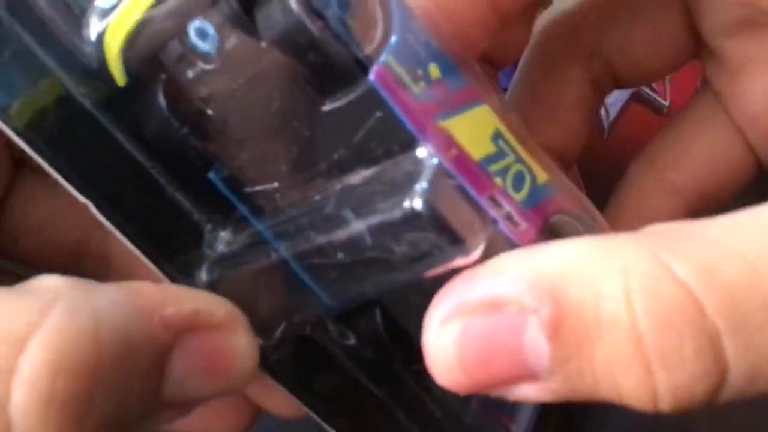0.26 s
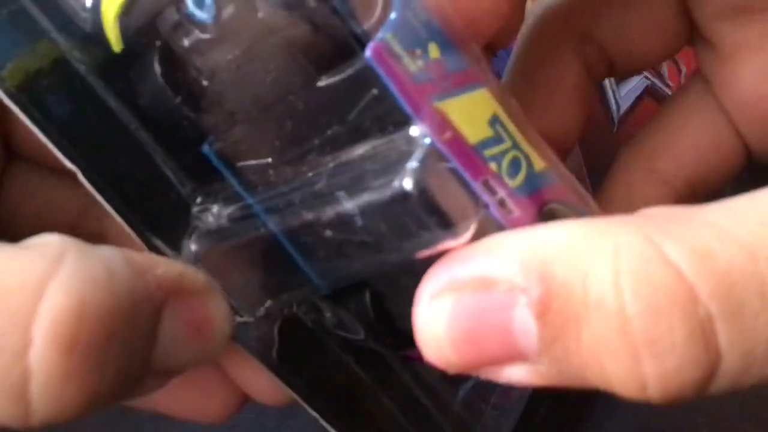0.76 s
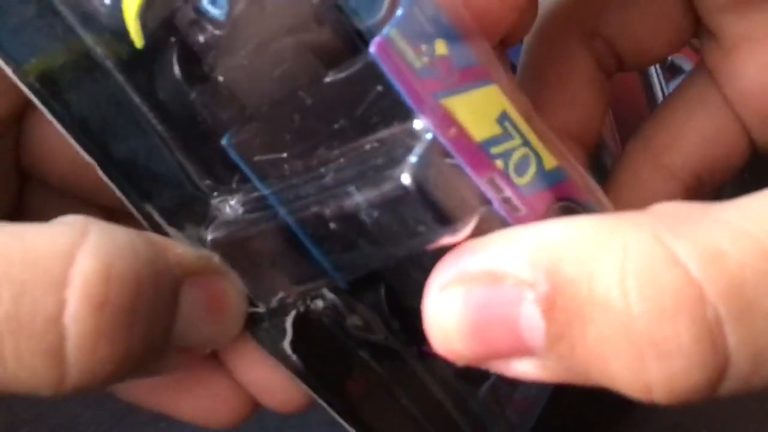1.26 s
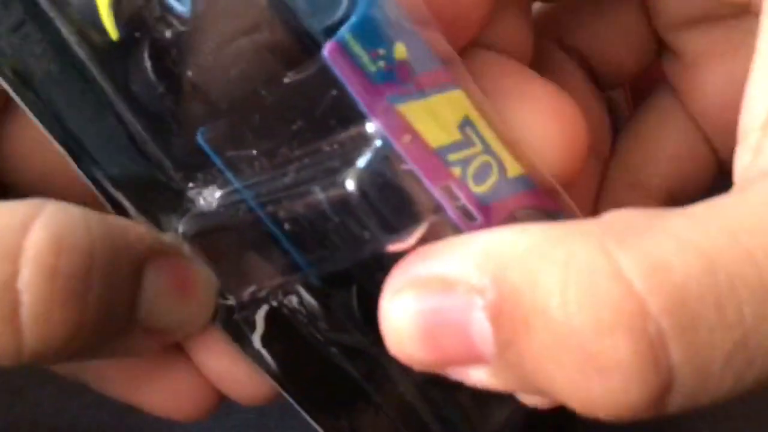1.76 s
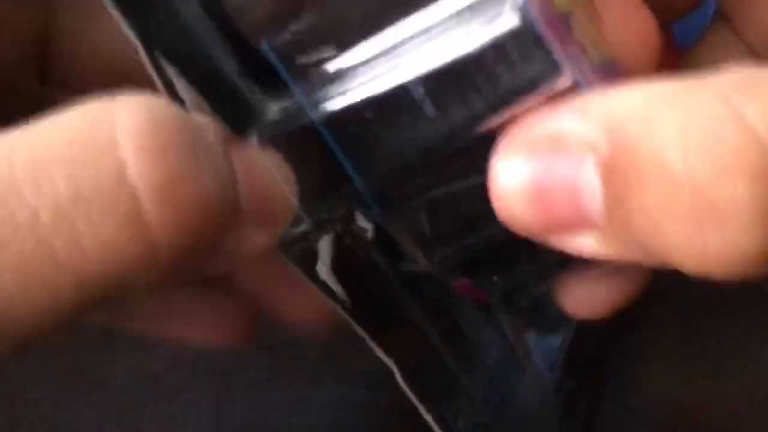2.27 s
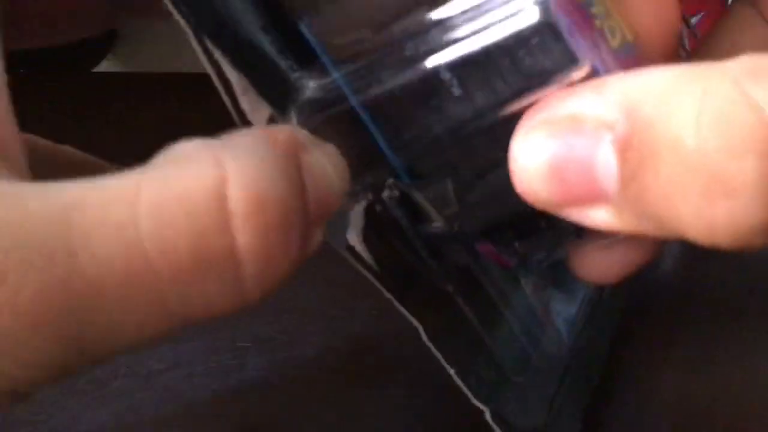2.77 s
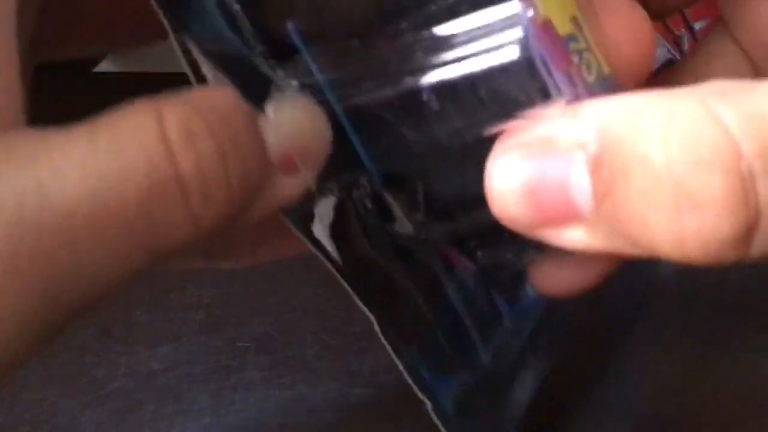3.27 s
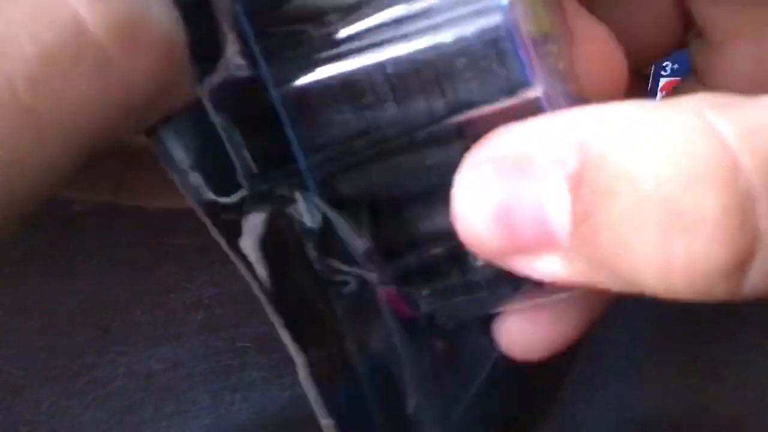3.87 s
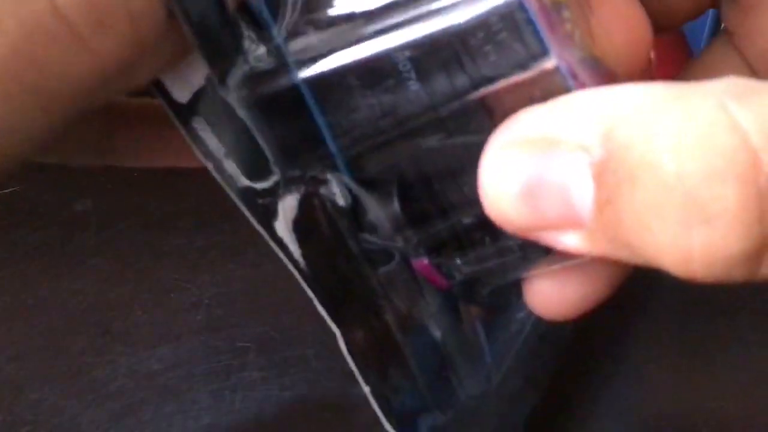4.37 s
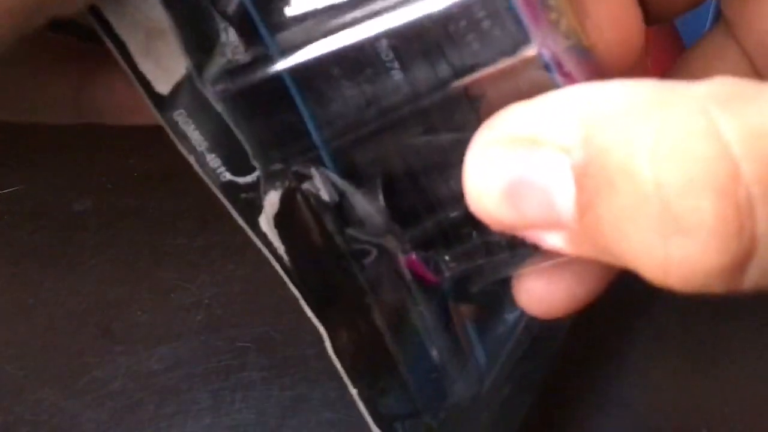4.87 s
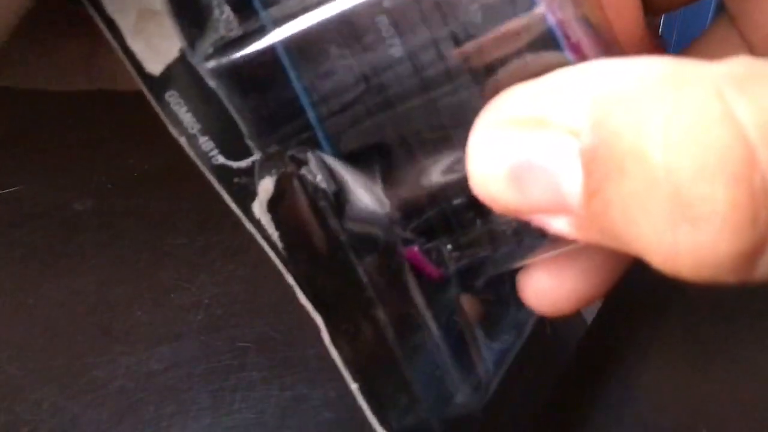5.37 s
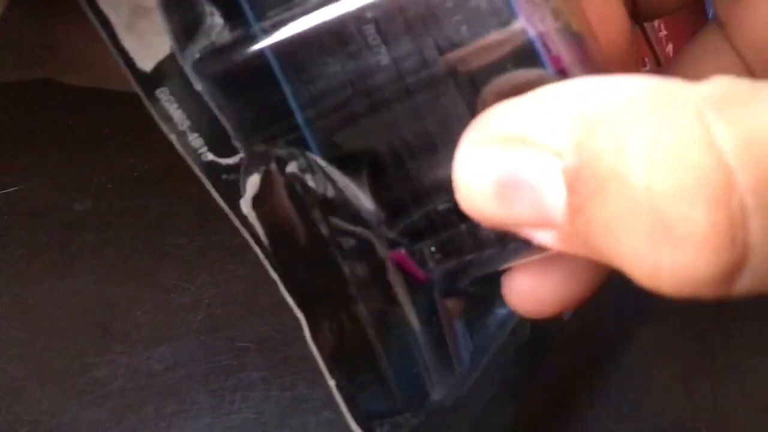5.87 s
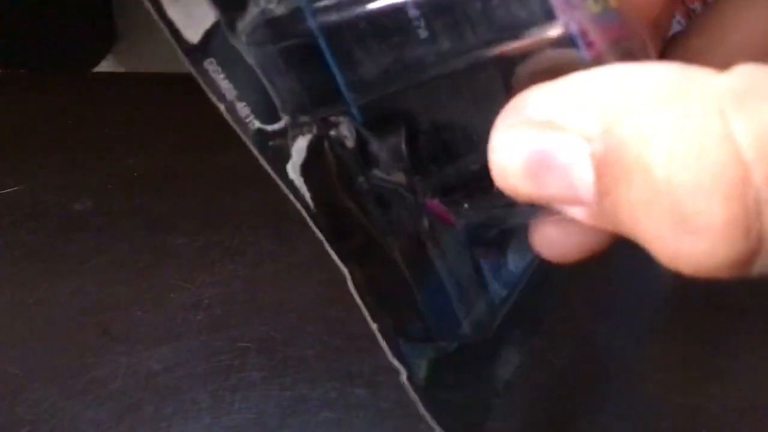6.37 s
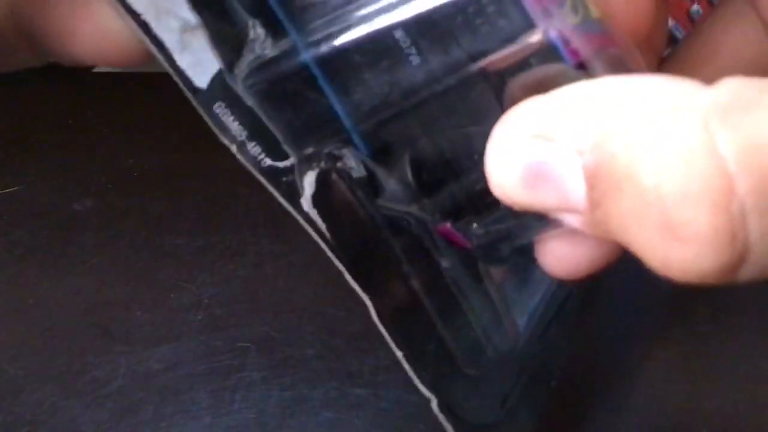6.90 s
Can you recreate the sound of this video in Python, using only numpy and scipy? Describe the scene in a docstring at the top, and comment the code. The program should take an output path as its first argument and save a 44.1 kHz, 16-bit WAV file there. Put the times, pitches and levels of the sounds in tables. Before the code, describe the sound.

Very close in a quiet small room, fingers rub and bend a stiff plastic blister pack on its card. Bright scraping and fine crackle run along with creasing ticks and hollow shell knocks. Sharp snaps cluster in the first seconds, then brief ripping bursts come near four, almost six and seven seconds, with softer handling between them.

```python
"""Prying open a plastic blister pack

Two hands bend and pry at a stiff plastic pack on its card, close by in a small room.
Fingers rub over the shell: noise shaped by the plastic, with crackle from tiny fractures.
Creases and the glued edge tick, fingers knock on the shell, and the dome buckles with sharp snaps:
each is a short burst of noise that dies fast, coloured by what is ringing."""
import sys
import numpy as np
from scipy import signal
from scipy.fft import rfft, irfft
from scipy.io import wavfile
from scipy.ndimage import uniform_filter1d

SR = 44100
rng = np.random.default_rng(int(sys.argv[2]) if len(sys.argv) > 2 else 0)


def store_wav(level_fs):
    """Save 16-bit WAV to argv[1]."""
    pcm = np.round(np.clip(np.atleast_2d(level_fs), -1, 1) * 32767)
    wavfile.write(sys.argv[1], SR, pcm.T.astype(np.int16))


N = 314874
TIME = np.arange(N) / SR  # seconds
TAPS = 2048  # length of one strike or filter, in samples
HZ = np.fft.rfftfreq(TAPS, 1 / SR)
LONG_HZ = np.fft.rfftfreq(N, 1 / SR)  # frequencies of the whole scene


def amp(db):
    """Turns decibels into a gain."""
    return 10 ** (np.asarray(db) / 20)


def unit(x):
    """Scales a sound to an rms of 1."""
    return x / np.sqrt(np.mean(x ** 2) + 1e-20)


def read(points, hz=HZ):
    """Reads a spectrum between its points, along a log-frequency axis."""
    f, value = np.transpose(points)
    return np.interp(np.log(hz + 1), np.log(f + 1), value)


def follow(rows):
    """Draws one curve in time for each column of a table after the first, which holds the seconds."""
    seconds, *columns = np.transpose(rows)
    return [np.interp(TIME, seconds, column) for column in columns]


def add(mix, start, sound):
    """Mixes a sound in at a time in seconds."""
    part = mix[max(round(start * SR), 0):][:len(sound)]
    part += sound[:len(part)]


def causal(db):
    """Makes a frequency response with these levels that rings only after it is struck (minimum phase)."""
    log_gain = np.log(amp(np.concatenate([db, db[-2:0:-1]])))
    return np.exp(np.conj(signal.hilbert(log_gain)))[:len(db)]


def ring(hz, lift_db, q):
    """Levels in dB of one resonance standing out of a flat spectrum; a higher q is narrower."""
    detune = q * (HZ / hz - hz / (HZ + 1))
    return 10 * np.log10(1 + (amp(lift_db) ** 2 - 1) / (1 + detune ** 2))


def coloured(x, db):
    """Gives a sound a spectrum, at an rms of 1."""
    return unit(signal.oaconvolve(x, irfft(causal(db)))[:N])


def noise(spectrum):
    """Steady noise with a given spectrum, at an rms of 1."""
    white = rfft(rng.standard_normal(N))
    return unit(irfft(white * amp(read(spectrum, LONG_HZ)), N))


def wander(rate_hz):
    """A smooth random curve with an rms of 1; a higher rate wanders faster."""
    white = rfft(rng.standard_normal(N))
    return unit(irfft(white * np.exp(-(LONG_HZ / rate_hz) ** 2), N))


def strike(db, decay, linger_db, linger, bass_hz=1600, front_db=-7, front=.0005, size=13):
    """A hard front, then bending waves scatter about the sheet and die fast, more slowly in the bass."""
    t = np.arange(TAPS) / SR
    burst, after = rng.standard_normal((2, TAPS))
    burst *= 1 + amp(front_db) * np.exp(-t / front)
    bass = 1 / (1 + (HZ / bass_hz) ** 2)
    quick = rfft(burst * np.exp(-t / decay))
    slow = rfft(burst * np.exp(-t / decay / 2))
    waves = (1 - bass) * quick + bass * slow
    waves += amp(linger_db) * rfft(after * np.exp(-t / linger))
    # the scatter keeps its ripple finer than size bins, while db sets the broad colour
    broad_power = uniform_filter1d(uniform_filter1d(abs(waves) ** 2, size=size), size=size)
    broad_db = 10 * np.log10(broad_power + 1e-12)
    return irfft(waves * causal(db - broad_db))


def quiet_room():
    """The steady, faint noise of the quiet room."""
    # Each row: frequency in Hz, relative level in dB.
    tone_spectrum = [(12, -52.5), (20, -2.5), (153, -5), (478, -15.5), (857, -16.5), (1540, -34.5),
                     (2090, -18.5), (2330, -18), (4430, -20.5), (15500, -23)]
    return amp(-73) * noise(tone_spectrum)


def rumble():
    """Low noise that swells and sinks as the hands jolt the air and the table."""
    # Spectrum of the rumble. Each row: frequency in Hz, relative level in dB.
    thud_spectrum = [(10, 1), (30, 8.5), (70, 5), (130, -6), (250, -11), (600, -48)]
    # How strong the rumble is. Each row: time in seconds, level in dB.
    jolt_levels = [(.9, -89), (1.2, -67.5), (1.55, -78), (1.78, -72), (2.3, -71), (2.5, -87), (3.9, -76),
                   (5.2, -84.5), (5.8, -70.5), (7.1, -78)]
    return amp(follow(jolt_levels)[0]) * noise(thud_spectrum)


def gliding(glide_db=-1.1, regrip_s=2.57, regrip_lasts_s=.15):
    """Share of smooth glide in the rubbing; it fades out around regrip_s, as the grip changes."""
    before_regrip = np.clip((regrip_s - TIME) / regrip_lasts_s + .5, 0, 1)
    return amp(glide_db) * before_regrip


def friction(arch=0.57, tear_range_db=22.5):
    """Grip, slides and tears add in power: gains of walls, hollow and edge, then amounts of crackle and glide."""
    # The holding fingers creep on the pack all the time, harder while they pull. Each row: time in seconds,
    # rub level in dB, then hollow body, fizz and crackle in dB relative to the rub.
    grip_rows = [(.1, -79, -3, 2, -17.5), (.62, -74.5, -9, 4, 0), (.99, -67, -8.5, 6.5, -4),
                 (1.25, -63.5, -11.5, 8, 4), (1.68, -69.5, -3.5, 4, 3), (1.98, -64, -9, 13.5, -6),
                 (2.1, -66.5, -0.5, 1.5, -3), (2.55, -78.5, 4.5, -2.5, -18), (2.98, -79.5, 1, 4, -26.5),
                 (3.25, -70.5, 3, 3.5, -4.5), (3.6, -74, 0.5, 6, 3.5), (4.1, -69.5, 1, 2.5, 4.5),
                 (4.9, -71.5, -3, 4, 1.5), (5.15, -73.5, 0, 3, 3.5), (5.6, -70, -3, 1, 4),
                 (6.3, -72.5, 0.5, 3, -8), (6.68, -70, 2.5, 5, 1.5), (7.13, -72.5, -5, 3, 4.5)]
    # A finger slides over the plastic. Each row: start in seconds, length in seconds, scrape level in dB,
    # then hollow body and fizz in dB relative to the scrape.
    slide_rows = [(0, 0.069, -61.5, -11, 0), (.21, 0.12, -73, -14, 1), (0.42, 0.093, -64.5, -19, 4.5),
                  (0.523, 0.082, -67, -13, 1), (0.649, 0.079, -68, -12, 5), (0.784, .07, -70, -15, 4),
                  (.885, .08, -65.5, -17, 2), (1.314, 0.041, -61.5, -20, 11), (1.517, 0.12, -64.5, -9, 6),
                  (2.304, .105, -63.5, -3, -1.5), (2.445, 0.065, -69, -0.5, -4),
                  (2.666, 0.12, -69.5, -4, 1), (2.865, 0.064, -66.5, -0.5, 0), (3.192, 0.072, -65, -9, 6),
                  (3.478, 0.054, -68, -3, 9.5), (3.647, .13, -70, 3, 13), (4.298, 0.12, -67.5, 1, 1),
                  (4.398, 0.15, -60.5, 0.5, 2.5), (4.934, 0.24, -76, 11, -5),
                  (5.188, 0.12, -68.5, 0.5, 5.5), (5.35, 0.12, -73, 1, 8), (6.077, 0.22, -62.5, 5.5, -3),
                  (6.355, 0.04, -67, 0.5, -4), (6.465, 0.064, -61, 1.5, -9), (6.525, 0.087, -66, 1, 4),
                  (6.71, 0.047, -66, -7, 6), (7.048, .1, -68.5, 11, -13)]
    # The glued seam strains, rips and runs out. Each row: peak in seconds, build-up in seconds,
    # run-out in seconds, level in dB, then hollow body, fizz and crackle in dB relative to that level.
    tear_rows = [(1.869, 0.19, 0.23, -53, -8.5, -9, 2), (2.2, 0.061, 0.1, -52.5, -2, 2, -6),
                 (3.112, 0.11, 0.087, -57.5, -1, -12, -3.5), (3.352, .03, .13, -56.5, -2.5, 8, 3),
                 (3.898, 0.13, 0.097, -45, 0.5, 0, -4), (3.966, 0.055, 0.064, -48, 3.5, 1, 1.5),
                 (4.58, 0.033, 0.089, -50, 1, 1, 2.5), (4.757, 0.0264, 0.054, -55, -1.5, -2, 3),
                 (5.78, 0.048, .055, -42, -8.5, 3.5, -2), (5.832, 0.031, 0.024, -45.5, -5, -1, -6),
                 (6.868, 0.052, 0.06, -45, 2, 3.5, 5)]
    level, body, fizz, crackle = follow(grip_rows)
    power = amp([level, level + body, level + fizz]) ** 2
    for start, length, db, slide_body, slide_fizz in slide_rows:
        # a slide speeds up and slows down as a half sine raised to a power
        speed = np.sin(np.pi * np.arange(0, 1, 1 / (length * SR))) ** arch
        for layer, layer_db in zip(power, (db, db + slide_body, db + slide_fizz)):
            add(layer, start, (amp(layer_db) * speed) ** 2)
    skin = power[0].copy()  # grip and slides, without the tears
    cracks = skin * amp(crackle) ** 2
    for peak, build, run_out, db, tear_body, tear_fizz, tear_crackle in tear_rows:
        t = np.arange(-2 * build, 2 * run_out, 1 / SR)
        # swells by tear_range_db over the build-up and falls by as much over the run-out
        strain = amp(-tear_range_db * np.maximum(-t / build, t / run_out))
        levels = (db, db + tear_body, db + tear_fizz, db + tear_crackle)
        for layer, layer_db in zip((*power, cracks), levels):
            add(layer, peak + t[0], (amp(layer_db) * strain) ** 2)
    walls, hollow, edge = np.sqrt(power)
    crackle_amount = np.sqrt(cracks / power[0])
    glide = gliding() * np.sqrt(skin / power[0])
    return walls, hollow, edge, crackle_amount, glide


def grains(per_s, spread_db, lift_db=14, count=20):
    """Sparse tiny fractures of uneven size, each ringing one of many spots on the sheet."""
    out = np.zeros(N)
    for hz in np.geomspace(2600, 14000, count):
        sizes = amp(spread_db * np.minimum(rng.exponential(1, N), 3))
        breaks = rng.random(N) < per_s / count / SR
        spot = strike(ring(hz, lift_db, q=14), decay=0.00053, linger_db=-16.0, linger=0.0028, size=41)
        out += signal.oaconvolve(sizes * breaks, spot)[:N]
    return unit(out)


def sheet(x, ripple_db=3.0):
    """The many narrow resonances of the thin sheet shift as the grip changes."""
    z = signal.stft(x, nperseg=512)[2]
    ripple = uniform_filter1d(rng.standard_normal(z.shape), size=4, axis=0)  # across frequency
    ripple = uniform_filter1d(ripple, size=16, axis=1)  # across time
    return signal.istft(z * amp(ripple_db * unit(ripple)), nperseg=512)[1][:N]


def rubbing(pressure_db=1.5, flutter_db=2.5, body_flutter_db=3.5, body_crackle_db=-5):
    """Smooth gliding, rough scraping and crackle sound through the hollow dome, its walls and the sharp edge."""
    # Spectra of a gliding finger in the walls and at the very top, of scraping and its fizz, and of the
    # hollow dome. Each row: frequency in Hz, relative level in dB.
    hiss_spectrum, air_spectrum = [(300, -17), (800, -5), (1150, 3.5), (1500, -1), (2000, -6.5),
                                   (3600, -12), (4200, 1), (4550, 10), (4950, -1), (5700, -13), (7500, -16),
                                   (11000, -18.5)], [(4500, -38.5), (7000, -3.5), (9000, -7.5), (11500, -4),
                                                 (13000, 3), (14500, 1), (15700, 2), (16500, -15.5)]
    scrape_spectrum, fizz_spectrum = [(900, -35.5), (1500, -3.5), (1800, 4), (2150, -1), (2800, 3.5),
                                      (3400, 0.5), (4100, 3), (5000, -2), (5700, 1.5), (6800, -3.5),
                                      (8000, -18), (11000, -45)], [(4500, -24.5), (6500, -30), (7500, -6.5), (9500, -3),
                                                      (10800, -4), (12400, 0), (14000, -3), (15700, -4),
                                                      (16500, -32)]
    body_spectrum = [(60, -25.5), (180, -9.5), (260, -3), (360, 5), (520, -2.5), (760, 4), (1020, 4),
                     (1200, 2.5), (1400, -2.5), (1700, -13), (2400, -40.5)]
    wall_gain, hollow_gain, edge_gain, crackle, glide = friction()
    scrape = np.sqrt(1 - glide ** 2)
    fractures = crackle * grains(per_s=340, spread_db=6.0)
    balance = np.hypot(1, crackle)  # keeps the power steady as crackle joins the noise
    smooth = (rng.standard_normal(N) * amp(pressure_db * wander(18)) + fractures) / balance
    rough = (sheet(rng.standard_normal(N)) * amp(flutter_db * wander(99)) + fractures) / balance
    walls = glide * coloured(smooth, read(hiss_spectrum)) + scrape * coloured(rough, read(scrape_spectrum))
    edge = glide * coloured(smooth, read(air_spectrum)) + scrape * coloured(rough, read(fizz_spectrum))
    # the dome answers to the slower stick and slip of the skin, and more faintly to each fracture
    slips = sheet(rng.standard_normal(N)) * amp(body_flutter_db * wander(70))
    hollow = coloured(slips + amp(body_crackle_db) * fractures, read(body_spectrum))
    return wall_gain * walls + hollow_gain * hollow + edge_gain * edge


def room(x, echo_db=-27, echo_s=0.01, tail_db=-23):
    """One early bounce off a near surface, with a faint short tail of fading noise."""
    # How fast the tail dies. Each row: frequency in Hz, time to fall by 60 dB in seconds.
    decay_times = [(200, 0.51), (1000, 0.14), (4000, 0.14), (14000, 0.29)]
    hz, t, z = signal.stft(rng.standard_normal(SR // 2), SR, nperseg=256)
    fading = amp(-60 * t / read(decay_times, hz)[:, None])
    tail = signal.istft(z * fading, SR, nperseg=256)[1]
    response = amp(tail_db) * tail / np.linalg.norm(tail)
    response[0] += amp(echo_db)
    return signal.fftconvolve(x, np.pad(response, (round(echo_s * SR), 0)))[:N]


def ticks(lift_db=8, wall_hz=4850, wall_db=8):
    """Each small crease has its own high ring; the wall that hisses under the gliding finger joins in."""
    # Creases and the glued edge give way. Each row: time in seconds, level in dB, brightness in dB.
    tick_rows = [(0.545, -21, 0.5), (0.7111, -28.5, 7.5), (0.813, -26, 1), (0.8694, -36, 9),
                 (0.955, -36.5, 15.5), (1.0747, -26.5, 13), (1.1145, -17, 4), (1.2594, -25, 9),
                 (1.2633, -14, 8), (1.279, -18, 5.5), (1.3106, -16, 5), (1.318, -20.5, 7),
                 (1.355, -10.5, -2), (1.3732, -19, 0), (1.4145, -19.5, 4.5), (1.487, -20, 5),
                 (1.5204, -21.5, 3), (1.5918, -13.5, 0), (1.8249, -19, 8), (1.8633, -29, 17),
                 (1.8924, -22, 5), (2.0187, -10.5, -16), (2.8318, -37, 9), (3.272, -28.5, 10),
                 (3.2818, -22, 8), (3.3417, -3.5, -4.5), (3.364, -29, 13), (3.397, -19, 7),
                 (3.4699, -33, 14), (3.499, -18.5, 2), (3.781, -26, 11), (3.804, -27.5, 13),
                 (3.9585, -16, -6), (3.974, -5, -18), (4.1204, -21, -2.5), (4.2726, -27.5, 6.5),
                 (4.314, -17.5, -4), (4.413, -15.5, 2.5), (4.5813, -17, -9), (4.6179, -26, 5),
                 (4.7509, -12, -4), (5.0486, -20.5, -2), (5.0725, -17.5, 4), (5.097, -17, -3),
                 (5.263, -20, 1), (5.434, -8.5, -38), (5.4632, -20, 1), (5.5082, -24, -1),
                 (5.5884, -14, -17.5), (5.704, -17.5, -1.5), (5.7285, -22.5, 3), (6.047, -36.5, 15),
                 (6.381, -10.5, -12.5), (6.5935, -15.5, 1), (6.921, -22.5, 2), (6.997, -25, -2)]
    # Basic colour of a tick. Each row: frequency in Hz, relative level in dB.
    tick_spectrum = [(100, -23), (400, -14), (1000, -14.5), (1700, -14), (2800, -7), (4600, -9.5),
                     (6500, -10), (9000, -5), (12500, -3.5), (16000, -8.5)]
    out = np.zeros(N)
    glide = gliding()
    for (s, db, bright), place in zip(tick_rows, rng.random(len(tick_rows))):
        crease = ring(2600 * 5 ** place, lift_db, q=9)  # anywhere from 2600 to 13000 Hz
        wall = ring(wall_hz, wall_db * glide[round(s * SR)], q=12)
        colour = read(tick_spectrum) + read([(4500, 0.0045), (9000, bright)]) + crease + wall
        add(out, s, strike(db + colour, decay=0.0021, linger_db=-22.5, linger=0.0086, size=45))
    return out


def knocks(shell_lift_db=19, shell_q=8.3, settle_s=.006, settle_db=-12.5):
    """A soft finger sets the whole shell swinging and settles with a second touch; the pitch follows the grip."""
    # Fingers bump the shell. Each row: time in seconds, level in dB around 300 Hz before the ring is added,
    # middle and treble in dB relative to that level, ring of the gripped shell in Hz.
    knock_rows = [(0.86, -34.5, 1.5, -1, 1430), (1.2147, -13, 2, -10, 347), (1.646, -23.5, -7, -12, 330),
                  (1.749, -13.5, -7, -5.5, 440), (1.771, -5.5, -4, -7, 197), (1.776, 1, -7, -9.5, 193),
                  (2.053, -16.5, -12.5, -7.5, 654), (2.119, -18.5, 2.5, -2, 646),
                  (2.1341, -19.5, 10, 7.5, 330), (2.1689, -4, -8.5, -22, 365),
                  (2.2516, -3, -20, -10.5, 780), (2.7403, -24.5, 0.5, -15, 1250),
                  (3.176, -24.5, 6.5, -6, 340), (3.299, -16.5, -12.5, -8, 1030), (3.3392, -19.5, 2, 4, 695),
                  (3.7664, -18, 15.5, -1, 273), (4.234, -17.5, -22, -29, 323), (4.41, -14, 0, -16, 330),
                  (4.4336, -8, -23, -30, 690), (4.4533, -19, -9, -7, 340), (4.477, -9, -20, -16, 694),
                  (4.5036, -17, 7.5, -16, 347), (4.571, -11, -3, -4.5, 382), (4.667, -9, -2.5, -21, 359),
                  (4.7415, -18, 6, -3.5, 854), (4.8162, -8.5, -5, -21, 366), (4.8717, -35.5, 18.5, -6, 740),
                  (5.368, -24.5, 3.5, -2.5, 394), (5.5909, -13.5, 8, -22, 404),
                  (5.5971, -17.5, 7, -31, 360), (5.6419, -16, 3, -38, 378), (5.6976, -18, 2.5, -48, 367),
                  (5.9012, -28, 19, 8.5, 372), (6.035, -22, 1, -15, 423), (6.053, -18.5, -2, -33, 410),
                  (6.269, -16, -11.5, -14, 910), (7.0881, -18, 18.5, -19, 540),
                  (7.1205, -16, -15, -10, 424)]
    out = np.zeros(N)
    lateness = rng.uniform(0.21, 1.8, len(knock_rows))  # in multiples of settle_s
    for (s, db, mid, treble, hz), late in zip(knock_rows, lateness):
        colour = read([(40, -28.5), (150, -3.5), (300, -4.0), (1000, mid),
                       (3200, treble), (7000, treble - 14), (16000, treble - 26)])
        shell = ring(hz, shell_lift_db, shell_q)
        # the second touch is lighter and lacks the ring
        for delay, touch_db in ((0, shell), (late * settle_s, settle_db)):
            hit = strike(db + colour + touch_db, decay=0.002, linger_db=-21, linger=0.015, size=7)
            add(out, s + delay, hit)
    return out


def snaps(dome_db=-3.5, linger_db=-28):
    """A facet of the dome flips over and rings for a few cycles, and the whole dome with it."""
    # The dome buckles; the row at 1.456 s is instead a crease ticking, voiced like the snaps. Each row: time in
    # seconds, level in dB around 3.2 kHz before the dome and rings are # added, bass, middle and top in dB
    # relative to that level, ring of the facet in Hz.
    snap_rows = [(1.0158, 12.5, -9.5, -14, -7, 993), (1.1381, -2.5, -5, -10.5, 6, 8660),
                 (1.4561, -12, -20, -15, 7.5, 4830), (1.5404, -15, -6, -14, 1.5, 4700),
                 (1.7786, -7, -4, 7.5, -4, 2180), (1.8013, -7, -9, -23, -0.5, 1160),
                 (1.8435, 5, -16, -13.5, -7, 1076), (1.868, -16, -19, -9, 8, 1000),
                 (1.9275, -13.5, -2, -24, -2, 7900), (2.1933, -5, -28, -3, -7, 757),
                 (2.246, -8.5, -6, 0.5, -10, 764), (2.4394, -6.5, -11, -7.5, 11.5, 2910),
                 (2.4493, -11.5, -8, -3, -21, 990), (3.0314, -12.5, -2.5, -6.5, -8, 1020),
                 (3.041, -6.5, -16, -11, 0, 800), (3.0851, -11.5, 6, 16.5, -16, 3180),
                 (3.0963, -10, -5, 14, 4.5, 9470), (3.116, -8, 0, -1, 0, 9900),
                 (3.159, -24.5, 14, 6, 13.5, 3560), (3.3437, -12.5, 9, 12.5, 1.5, 3460),
                 (3.5371, -18.5, -7, -9, 12.5, 3150), (3.8438, -15, 5, 16, -11, 3340),
                 (3.9142, 3.5, 1, -7.5, -11.5, 1930), (3.9478, -1, -4, -8, -12, 9800),
                 (4.568, -25.5, 23.5, 18, 11, 3480), (5.795, 2, -24, -0.5, 2, 5940),
                 (5.7975, -6.5, -12, 2, 15, 883), (6.1884, 7, -32, -4, -2.5, 5600),
                 (6.8704, -11, -11, -13, 3, 920), (6.873, -13, -8, 14.5, 3, 977),
                 (7.0524, -5.5, -4.5, 8.5, 5.5, 3120)]
    # Resonances of the whole dome, shaken by every snap. Each row: frequency in Hz, lift in dB, sharpness Q.
    dome_rings = [(339, 9, 18), (706, 5.5, 9.5), (1492, 1, 20), (2620, 6.5, 20), (3540, 3, 11),
                  (4700, 3.5, 4), (9040, 2, 5.6)]
    out = np.zeros(N)
    dome = dome_db + sum(ring(hz, lift, q) for hz, lift, q in dome_rings)
    for s, db, bass, mid, top, hz in snap_rows:
        # small facets ring higher, stand out less and die sooner
        octaves = np.log2(hz / 1000)
        lift = 16 - 2 * octaves  # dB
        decay = 0.002 * 0.91 ** octaves  # seconds
        colour = read([(50, bass - 20), (170, bass - 3), (300, bass), (1200, mid),
                       (3200, 0.01), (11000, top), (13500, top - 1), (16000, top - 8)])
        levels = db + colour + dome + ring(hz, lift, q=11.1)
        add(out, s, strike(levels, decay, linger_db, linger=0.0059, size=23))
    return out


def scene():
    """The pack in the hands, the room's answer and its quiet background."""
    pack = rubbing() + ticks() + knocks() + snaps()
    background = quiet_room() + rumble()
    return (pack + room(pack) + background)[None]


def record(dry, edge_hz=16050):
    """Limits the band: a steep filter takes away what lies above edge_hz."""
    low_pass = signal.firwin(255, edge_hz, window=("kaiser", 9), fs=SR)
    return signal.oaconvolve(dry, low_pass[None], "same")


dry = scene()
out = record(dry)
store_wav(out)
```